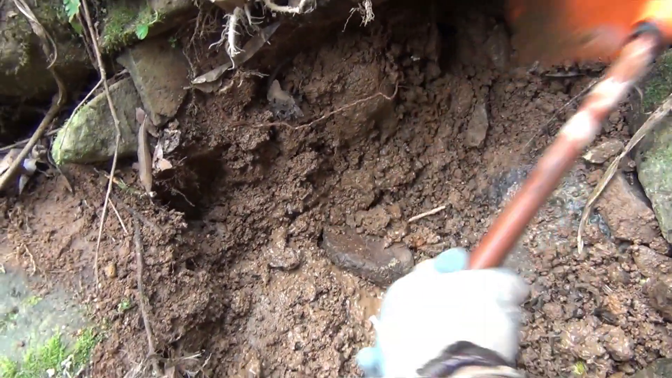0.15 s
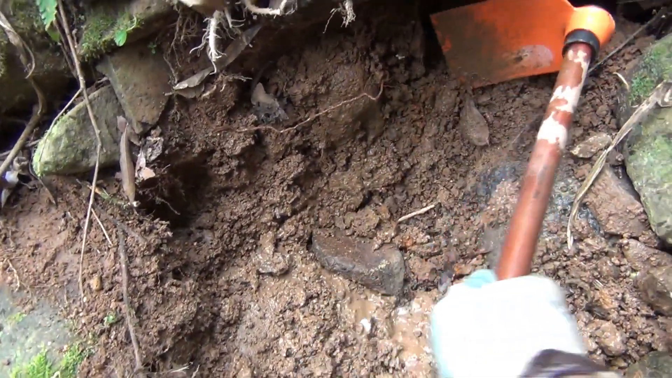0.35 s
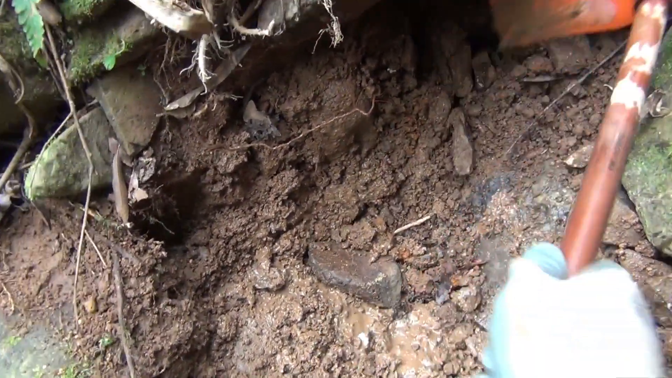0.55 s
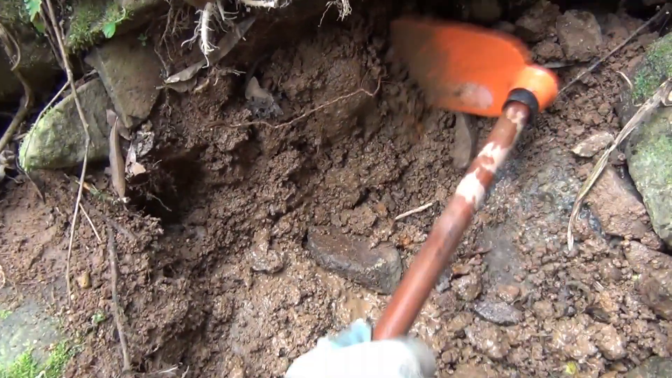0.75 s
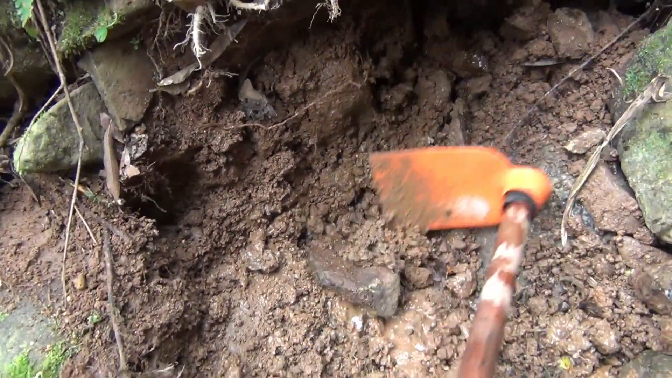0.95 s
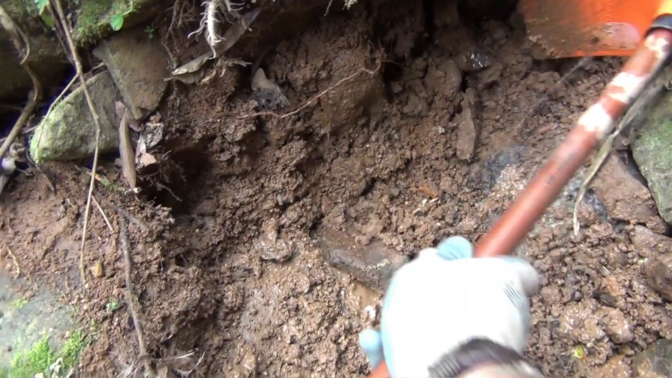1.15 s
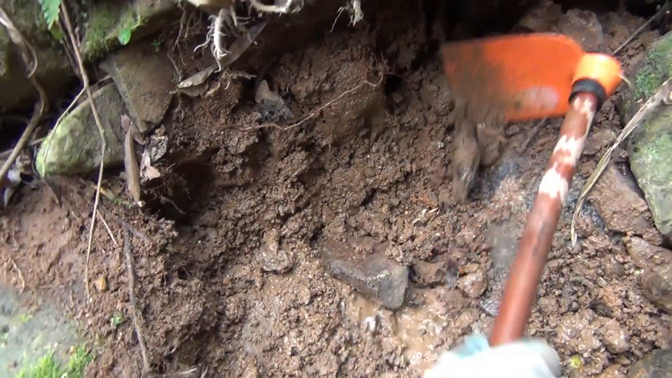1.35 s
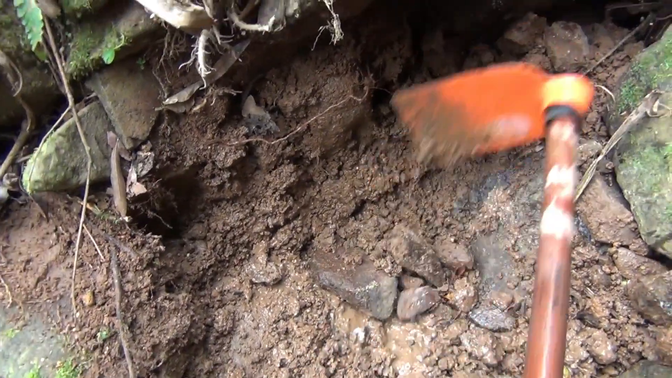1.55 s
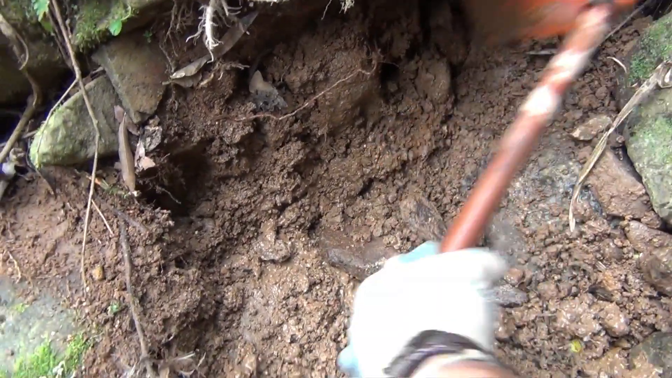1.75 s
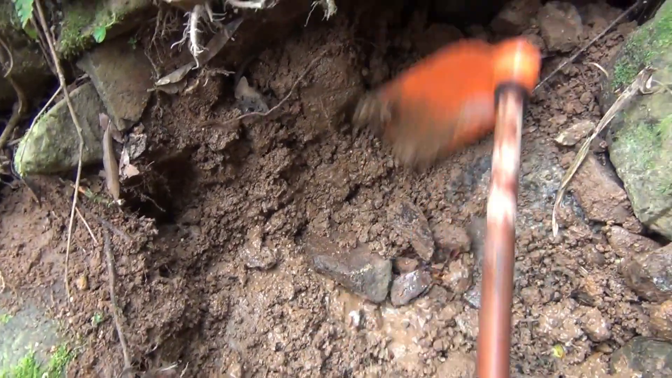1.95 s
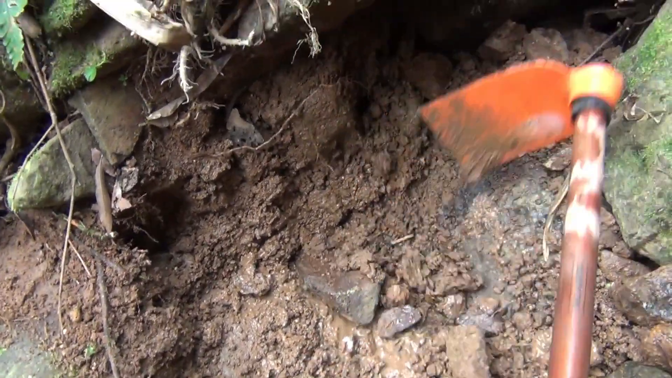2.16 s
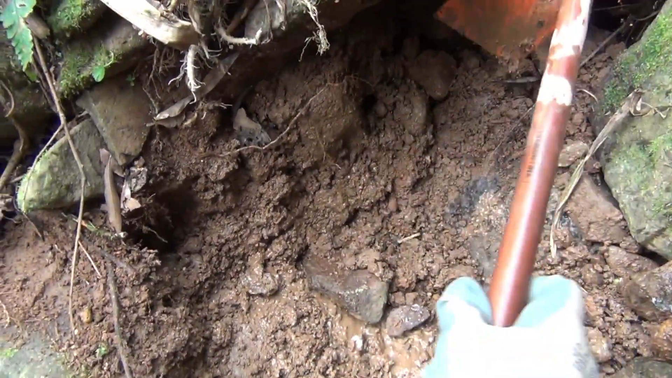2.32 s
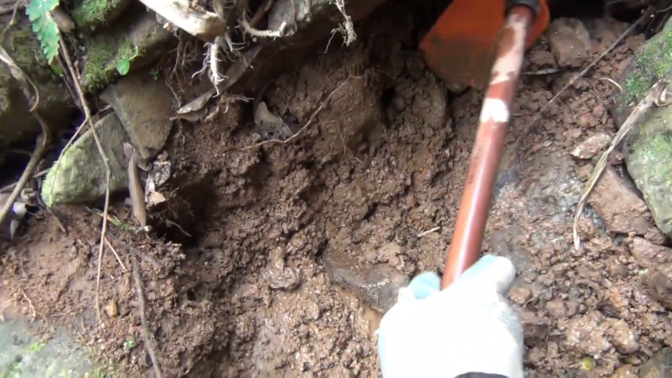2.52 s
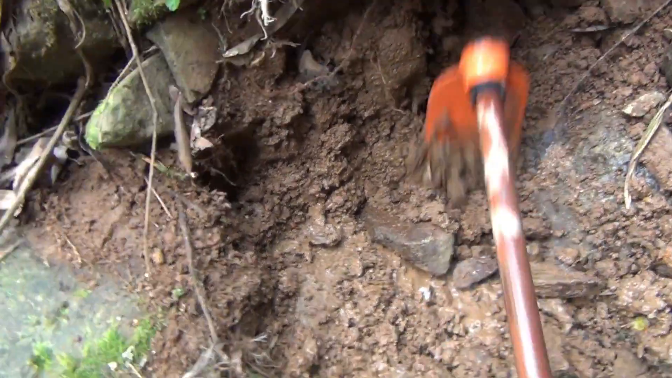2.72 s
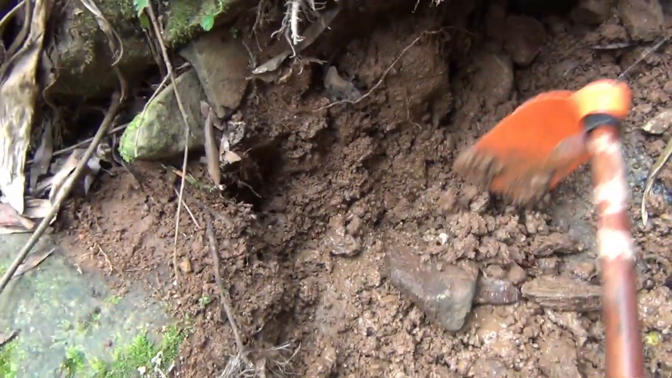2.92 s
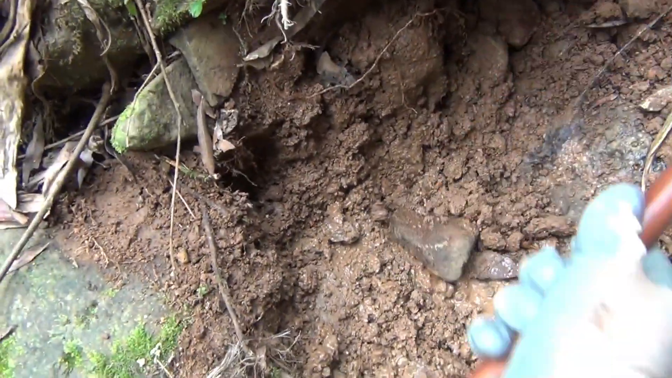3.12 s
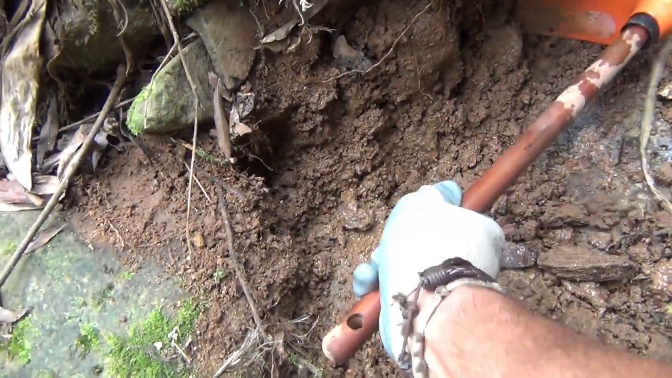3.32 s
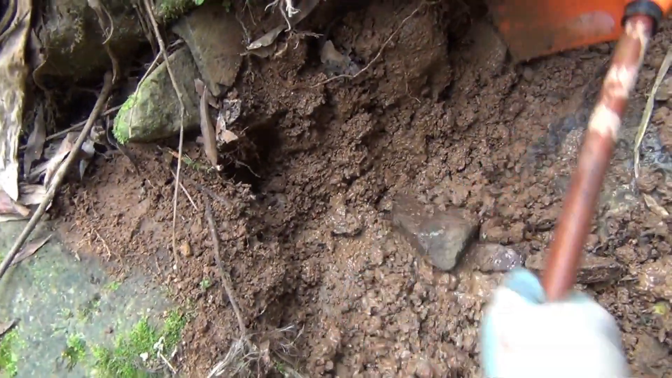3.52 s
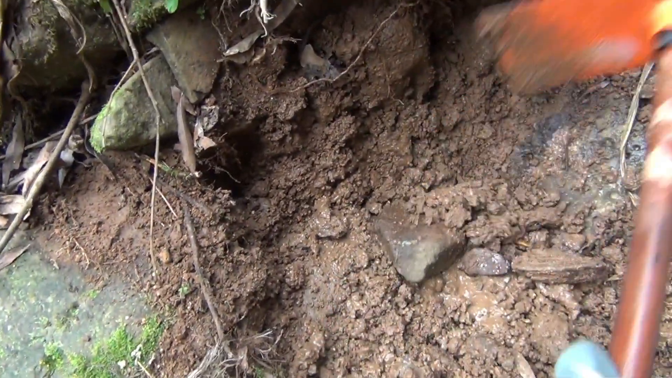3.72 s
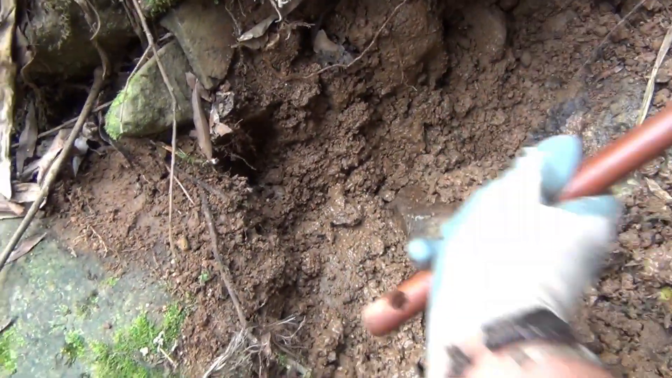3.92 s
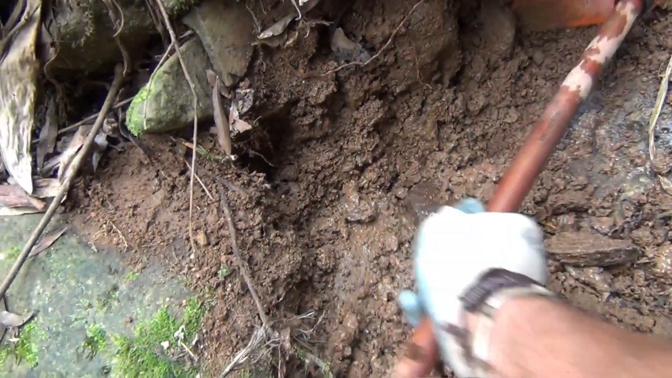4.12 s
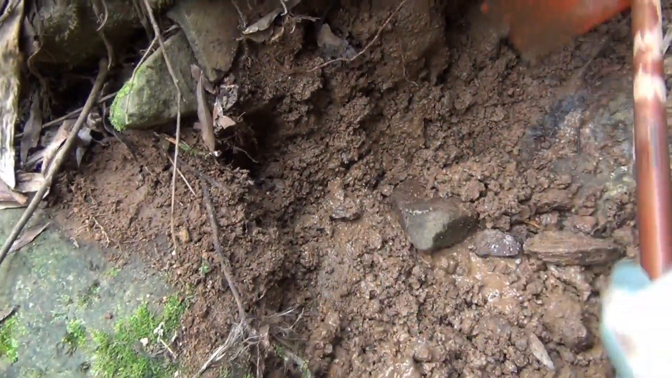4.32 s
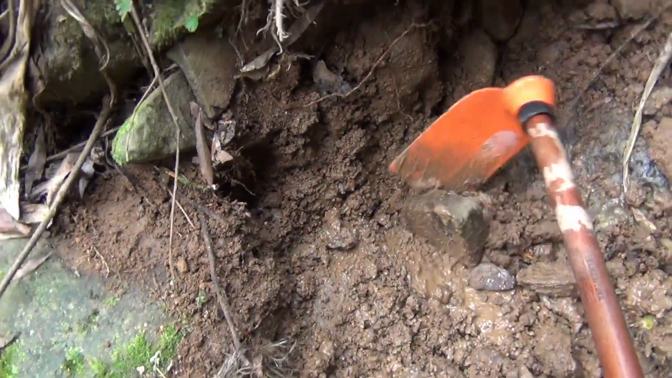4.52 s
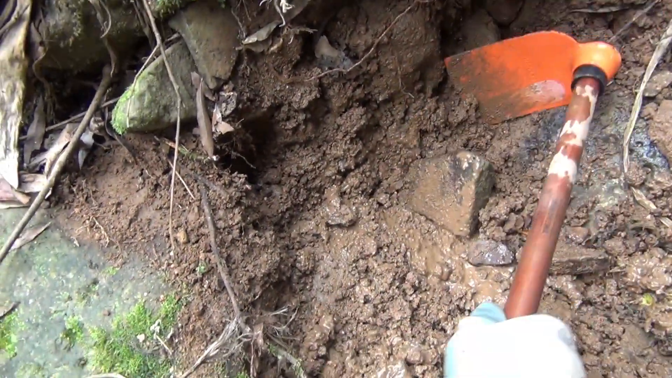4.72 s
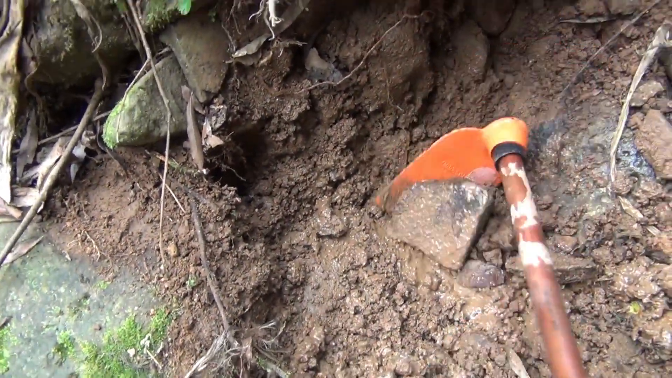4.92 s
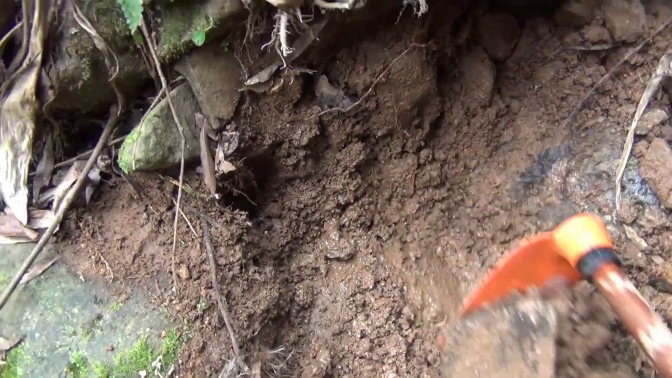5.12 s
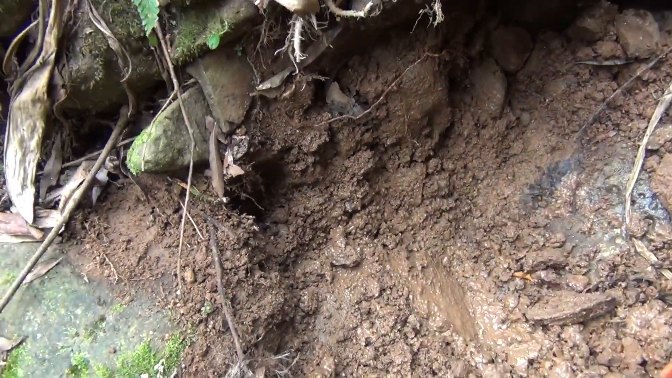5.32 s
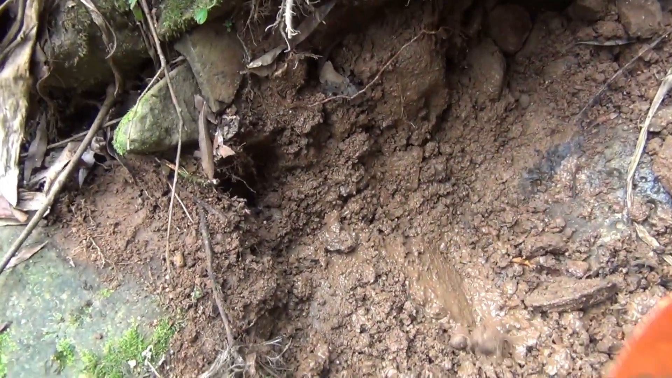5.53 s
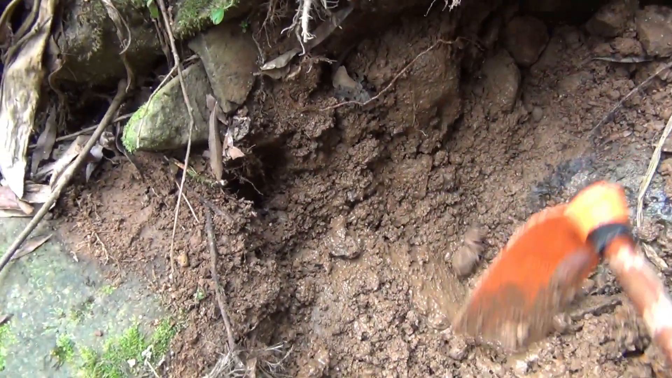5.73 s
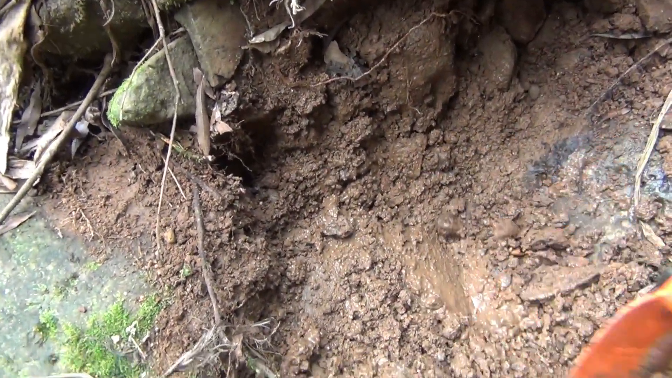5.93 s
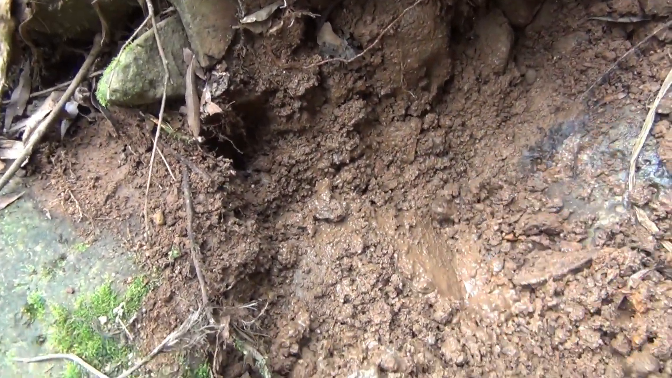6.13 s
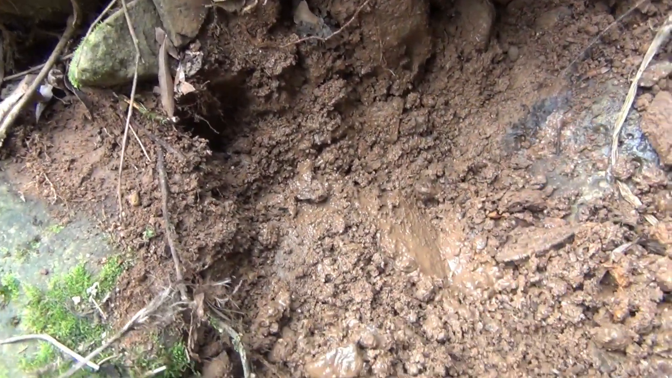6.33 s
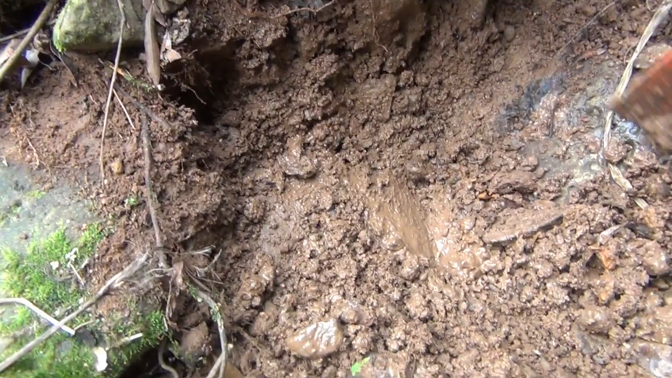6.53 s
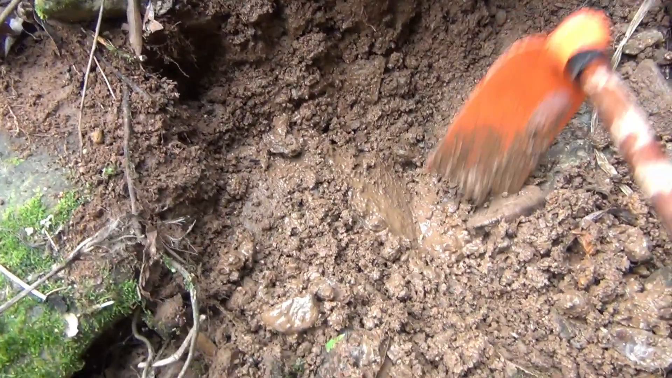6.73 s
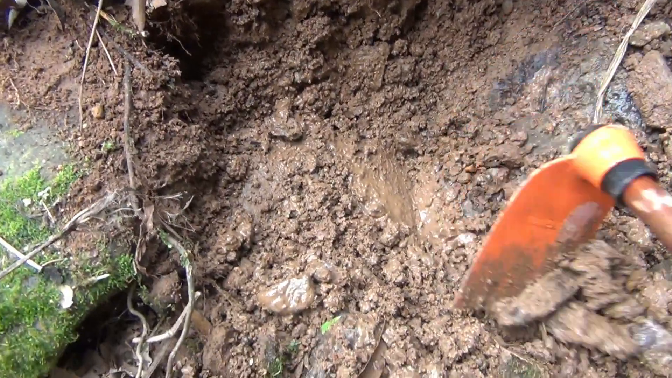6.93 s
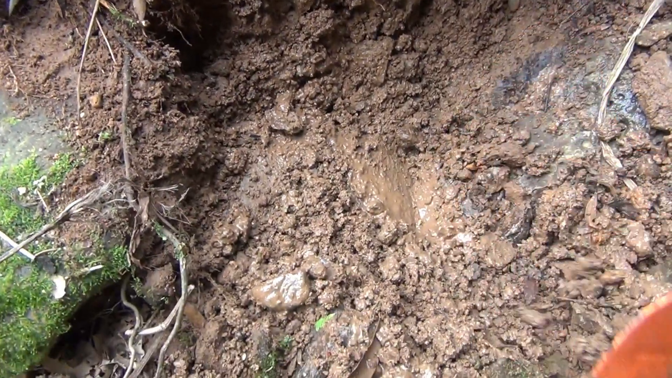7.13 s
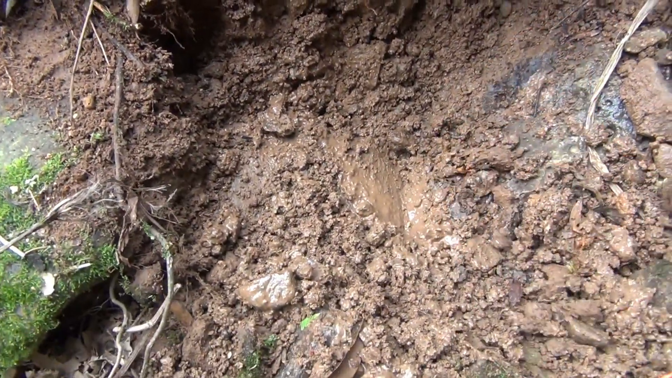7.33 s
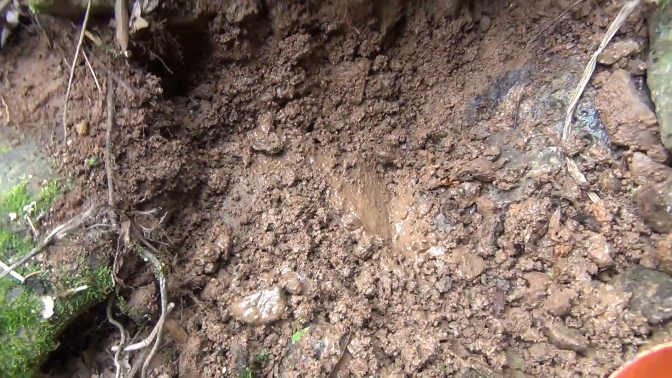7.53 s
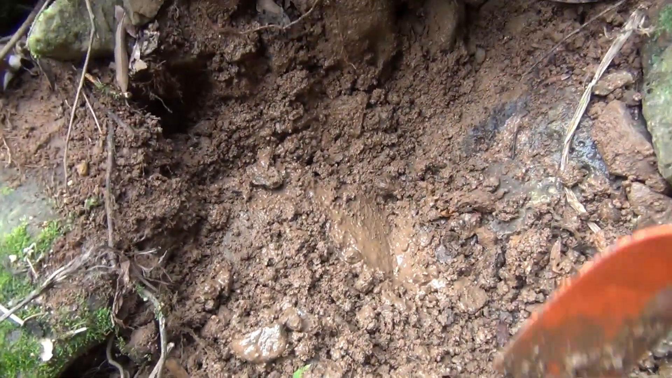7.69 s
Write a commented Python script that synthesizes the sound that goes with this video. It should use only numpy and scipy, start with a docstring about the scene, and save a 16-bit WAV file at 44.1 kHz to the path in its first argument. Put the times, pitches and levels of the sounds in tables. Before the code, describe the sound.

A small steel hoe digs into damp, stony soil outdoors, about an arm's length away and straight ahead. Each strike is a short crunch with a quickly damped metallic clink, and the hardest carry a low thump. A knock at 0.1 seconds is followed by a rapid cluster from 0.6 to 0.8, then strong hits near 1.2, 1.7, 1.9, 2.5, 2.7, 3.3, 4.0, 4.4, 4.7 and 5.0 seconds. Between them grit rasps along the blade, crumbs trickle down and clods roll over with a soft, hollow rumble. From about 5.1 seconds the work is quieter, with light scrapes and taps around 5.8, then one sharp strike at 6.7 and a crunchy drag until 7.2 before the dirt settles. A faint wash of water and a low hum continue underneath. Thin, distant bird whistles come in the first half second and near 3.8, 5.5 and 6.6 seconds.

```python
"""A small steel hoe chops and drags through damp, stony soil, outdoors at arm's length.
Each knock is a short crunch that rings the mud-damped blade; loud ones overload the input with a thump.
Between knocks, grit rubs along the steel, crumbs trickle down and clods roll over.
Behind it sit a soft wash of water, a low hum and far bird whistles."""
import sys
import numpy as np
from scipy import signal
from scipy.fft import rfft, irfft, next_fast_len
from scipy.io import wavfile
from scipy.ndimage import uniform_filter1d

SR = 44100
rng = np.random.default_rng(int(sys.argv[2]) if len(sys.argv) > 2 else 0)


def log_audio(samples):
    """Write samples as a 16-bit WAV file to the path given in sys.argv[1]."""
    # one column per channel
    frames = np.atleast_2d(samples).T
    # limit to full scale, then quantise
    limited = np.clip(frames, -1, 1)
    pcm = np.round(limited * 32767).astype(np.int16)
    wavfile.write(sys.argv[1], SR, pcm)


N = 342216
HIT_SAMPLES = 4096

# The blade's modes. Each row: pitch in Hz, relative level in dB, t60 in seconds before damping scales it.
BLADE_MODES = [(608, -3, 0.034), (707, 2, 0.054), (1059, 7.5, 0.018), (1199, -7, 0.049), (1600.5, -6, 0.04),
               (1894, 0, 0.01), (2280, 4, 0.01), (3140, -0.5, 0.018), (3680, 4.5, 0.0093),
               (4310, -10.5, 0.0055), (5357, -9, 0.066), (5927, -4, 0.018), (6510, -5, 0.025),
               (6870, -5.5, 0.01), (7580, -12, 0.014), (8560, -9.5, .025), (8940, -3.5, 0.014),
               (10550, -8, 0.012), (12900, -15, 0.031), (13400, -23, 0.015), (15200, -15.5, 0.016)]
# Strokes through grit. Each row: start and end in seconds, first and last level in dB, dull and bright
# trims in dB, bare steel over soil in dB, singing pitch in Hz, its relative level in dB.
DRAG_STROKES = [(0.331, 0.394, -33, -31.5, 2.5, -1.5, 6.5, 3600, -12),
                (1.202, 1.29, -30, -55.5, 4, -3, 3, 3700, -6),
                (1.308, 1.409, -32, -32.5, -2, -4.5, -1.5, 3100, -9),
                (1.779, 1.872, -39, -27, -3.5, -4.5, 4.5, 3600, -5),
                (2.48, 2.512, -17.5, -35, 0.5, -5, 0.5, 2100, -8),
                (2.541, 2.674, -35, -24, -1.5, -4.5, -1.5, 696, -4),
                (2.7, 2.803, -19.5, -36.5, -6, -1, 2, 3100, -17),
                (3.315, 3.41, -50, -52, -6, -3, -4.5, 3700, -6),
                (3.403, 3.494, -38, -23, -10, -3.5, 14, 3260, -10),
                (3.554, 3.601, -23, -31.5, -4.5, -3, 0.5, 5330, -6),
                (3.987, 4.173, -40, -55, -7, -5.5, -3.5, 3500, -14),
                (4.176, 4.356, -34.5, -25.5, -4.5, 1.5, 7, 5940, -9.5),
                (4.394, 4.419, -7, -30.5, -15, 4, -1, 6000, 2),
                (4.728, 4.755, -36, -45, 8, 8, -4.5, 700, -3),
                (4.759, 4.88, -26.5, -38, 1, -3, 4, 3200, -3),
                (4.886, 4.996, -33, -30.5, -3.5, -6.5, -4.5, 1760, 1.5),
                (5.01, 5.173, -34.5, -39.5, -8.5, -6.5, -3, 1076, -7),
                (5.196, 5.28, -38.5, -36, -11.5, -6, 0, 3670, -6),
                (5.779, 5.974, -35.5, -41.5, -6, 0, 0.5, 4010, 0),
                (5.971, 6.135, -41, -40, -15, -6, -4, 1105, -6.5),
                (6.246, 6.313, -52, -42.5, -11.5, 8, -15, 2980, -3),
                (6.758, 6.863, -43, -31, 0.5, -0.5, -3.5, 4250, 0.5),
                (6.874, 6.929, -22, -34, -3, 0, 1.5, 1090, -5),
                (6.944, 6.982, -32.5, -38, 3.5, -1.5, -5, 2780, 1),
                (7.023, 7.091, -39, -40.5, -4, -1, -1, 1090, -9),
                (7.089, 7.217, -39, -39.5, -12, -1, -5, 3840, -5)]
# The tone of fine crumbs. Each row: frequency in Hz, gain in dB.
CRUMB_EQ = [(300, -25.5), (600, -3.5), (1200, -6.5), (2500, 0), (4000, 1), (6500, -4.5), (10000, -9),
            (16000, -22)]


def knocks():
    """The hoe bites: a crunch builds and dies, and where the blade is hit decides which modes answer."""
    # Each row: start in seconds, relative level in dB, dull and bright trims in dB,
    # rise and decay in ms, leading pitch in Hz.
    hits = [(0.1347,-0.5,-13,-9,0.97,5.1,3680),(0.1571,-3.5,-5,-5,2.4,2.4,3800),(0.1595,-10.5,-3,-14,10.4,4.2,3700),
            (0.3487,-13.5,-18,-12,3.6,2.6,2250),(.3755,-18,-9,-2.5,1.5,10,2200),(0.4412,-26.5,-14,-19,1.3,2.4,3580),
            (.625,-8.5,-11.5,-3.5,1.6,1.7,3740),(0.63,-0.5,-13,-11.5,0.57,4.2,2030),(0.6597,-6,-13.5,-0.5,1.3,7.6,3750),
            (0.6632,-2.5,-23,-23,11.4,4.6,3770),(0.684,-4.5,-18,-23,6.4,3.5,3670),(0.6961,-7,-5,-2.5,3.6,8.3,3670),
            (0.719,1,-18,-8,1.2,1,3780),(0.7242,-4,-1.5,-7,1.76,3.8,3100),(.76,-19,-24,5,1.1,2.9,3060),
            (0.7675,2.5,-10,-8,1.7,3.3,3170),(0.8095,-10,0,-11,0.71,6.9,692),(0.888,-25.5,-8.5,-12.5,3.1,9.6,1960),
            (1.1184,-40,22,-6,0.82,8.5,720),(1.154,-18,-22,-3,4.9,3,3680),(1.1625,-2,-15,-8,4.8,.9,3660),
            (1.166,-1.5,-14,-4,8.9,5.5,3680),(1.2444,-32.5,11,-3,2.1,9.5,590),(1.3478,-15,-7,-4,0.77,5.2,2870),
            (1.3541,-17.5,-7,-5.5,9,8.5,3040),(1.4003,-16.5,-8,0,3,5.8,8600),(1.465,-22.5,-15.5,-18,1.04,.7,2300),
            (1.7434,-3,-4,-2.5,2.1,3.8,600),(1.8211,-16.5,-6,-3.5,2.7,2,3620),(1.8456,-21.5,-3,-9,4.9,9.5,3530),
            (1.871,-14.5,-5.5,-8,17,3.9,3460),(1.923,-1.5,-9.5,-8.5,1.6,4.2,3220),(1.9518,-5,-15,-3,.8,5.6,8980),
            (1.9761,-4,-1.5,-10.5,2.5,2,1900),(2.063,-33.5,-22,-2.5,1.15,1.6,2680),(2.4649,-5.5,-15.5,-17.5,7.3,6.6,3190),
            (2.5116,-9.5,-13,-21,1.3,2.9,2060),(2.5594,-16,-1.5,-31,0.71,2.2,635),(2.6423,-15,.5,-4.5,7.8,20,2870),
            (2.6749,-7.5,-3.5,-4.5,3.3,4.4,3470),(2.6965,-4.5,-8.5,-8,2,4.1,3140),(2.7247,-6,-8,4,0.42,3.2,7740),
            (2.745,-13,-10,0,0.78,2.3,6510),(2.7957,-22.5,-5.5,-10,7.5,4,2430),(3.05,-41.5,-19,1,0.9,1.8,6430),
            (3.177,-44,-3.5,0,2,1.9,2310),(3.2836,-25.5,-42,5,0.78,1.3,5100),(3.2921,-1.5,-11.5,-4,2.6,3.1,3400),
            (3.2939,-10,-4.5,-4.5,12.6,3.8,3960),(3.4187,-20,-7,-6.5,1.9,9.8,3270),(3.444,-17.5,-9.5,-9,2.5,18,3240),
            (3.4678,-12.5,0,7,1.4,2.7,6790),(3.4802,-14,8,-17,3.7,1.8,590),(3.4895,-11,-5,0,11.4,5.7,1598),
            (3.5471,-20,-20,6,1.9,8.2,5330),(3.561,-10.5,-2,1,2.6,2.7,3700),(3.9973,-1.5,-29,-3,0.81,2.7,3170),
            (4.0053,1,-11.5,-4,3.8,2.5,3670),(4.181,-24.5,-3.5,-4,1.5,2.6,3970),(4.2548,-16,1.5,1.5,1.6,3.6,6240),
            (4.282,-18,-4,-2,1.1,7.3,1610),(4.303,-19.5,5,5.5,3.3,3.6,704),(4.314,-17.5,-3,-4,1.8,8.3,1560),
            (4.346,-15,-14,-2,1.1,3.3,1590),(4.326,-17.5,-10,7,2.5,5.3,5260),(4.3718,-2,-12,-3,0.99,2.2,3250),(4.4064,-3.5,-9.5,-3,2.1,3.8,2280),
            (4.4246,-19.5,-4,-26,0.75,4.6,1090),(4.6949,2,-12,-12.5,1.02,2.9,3200),(4.7657,-15,-3,-5,1.4,2.3,3200),
            (4.7915,-10.5,-7.5,-6.5,1.1,5.6,3240),(4.816,-16,-14,2.5,0.74,1.1,5430),(4.8322,-18,-7,2.5,1.3,9.6,6950),
            (4.904,-28,-16,-1,9.4,2.8,1690),(4.9766,-9,-14,-22,1.1,2.6,2220),(4.988,-12,-2.5,-3,2,5.9,1503),
            (5.0095,-7.5,-3.5,-7,0.23,9.9,1090),(5.0305,-21,-2,-17,0.68,1.7,1080),(5.0606,-30,-26,8,4.8,4,6200),
            (5.2045,-25,-16,-17,.66,1.1,3500),(5.2772,-22,-5.5,-7.5,8,4.6,1070),(5.337,-30.5,-9.5,-14,0.72,3,2740),
            (5.4633,-35,-9,-11,0.73,3.6,3800),(5.7385,-13,-9,-7,6.2,10,3080),(5.7506,-14.5,-1.5,1.5,12.5,4.3,3993),
            (5.8549,-24.5,-7,0.5,5.2,1.5,3900),(5.9689,-35.5,9.5,16,3.1,4.4,8100),(5.9925,-24.5,6.5,3,2.1,2,3650),
            (6.046,-14,-31,-14,1.8,1,3140),(6.2285,-22,-20,-3.5,1.4,1.8,2860),(6.381,-33,-13,5.5,1.3,7.2,7600),
            (6.528,-50.5,20,12,3.5,4,480),(6.6074,-29,-3.5,-21,3.6,1.3,2700),(6.7388,1,-9.5,-6,0.58,2.6,3040),
            (6.8267,-15.5,-7,-10,1.2,0.59,3980),(6.887,-19,-7,1,7.4,17,3920),(6.9131,-25.5,8,-7,9.3,4.3,1150),
            (6.9966,-17,-15,-11,1.1,11,3500),(7.0062,-7,-0.5,-3,7.6,5.1,3720),(7.029,-20,-12,4,1.4,3,3830),
            (7.0414,-17,1.5,2.5,2.2,4.2,1110),(7.0981,-23,-14,-4.5,6,27,3970),(7.164,-29,-19,-4,1.5,2.4,3850),
            (7.2007,-22,-15,-11,0.41,3.6,4160),(7.552,-39.5,-14,2,4.6,13,3770)]
    # The broad crunch of soil and stone. Each row: frequency in Hz, gain in dB.
    soil_eq = [(200, -14), (350, -8), (700, -2), (1500, -1), (2500, 3), (4000, 2), (7000, -3), (11000, -8),
               (16000, -12)]
    out, lead_in_ms = np.zeros(N), 12
    ms = 1000 * np.arange(HIT_SAMPLES) / SR - lead_in_ms
    soil, bands = eq_response(soil_eq, HIT_SAMPLES), tone_bands(HIT_SAMPLES)
    stroke_starts, stroke_steel_db = np.transpose(DRAG_STROKES)[[0, 6]]
    mode_hz = np.array(BLADE_MODES)[:, 0]
    chance = rng.standard_normal((len(hits), 3, len(mode_hz), 1))
    for (start, db, dull_db, bright_db, rise, fall, lead_hz), (spot, grip, shift) in zip(hits, chance):
        shape = np.where(ms < rise, np.maximum(ms / rise, 0) ** 0.84, np.exp(-(ms - rise) / fall))
        settling = amp(-21.5) * np.exp(-ms / 14) + amp(-40.5) * np.exp(-ms / 45)  # loosened crumbs
        shape += settling * (ms > rise)
        shape += amp(-19.5) * np.exp(ms) * (ms < 0)  # the edge cuts through soft soil first
        grains = np.repeat(rng.standard_normal(HIT_SAMPLES // 32), 32)
        shape *= amp(3.08 * grains)  # stones crack one after another
        # The mode nearest the leading pitch takes most of the blow, bent there by the load of soil.
        nearest = (np.arange(len(mode_hz)) == np.argmin(np.abs(mode_hz - lead_hz)))[:, None]
        detune = np.where(nearest, lead_hz / mode_hz[:, None], 1 + 0.0092 * shift)
        steel_db = np.interp(start, stroke_starts, stroke_steel_db)  # bare steel rings louder, longer
        damping = np.where(nearest, 1.6, 2.1) * amp(-.4 * steel_db) * 1.25 ** grip
        strike_db = np.where(nearest, 11.0, 5.6 * np.clip(spot, -3, 1.2)) - 3 + steel_db
        ring = (amp(strike_db) * blade_response(damping, detune)).sum(axis=0)
        blow, crush = rfft(rng.standard_normal((2, HIT_SAMPLES)) * shape)
        crunch = blow * ring + crush * amp(17) * soil
        parts = [irfft(crunch * band) for band in bands]
        width = np.sum(shape ** 2) + 60  # samples over which the energy is spread
        dull, middle, bright = (part / np.sqrt(np.sum(part ** 2) / width) for part in parts)
        knock = middle + amp(dull_db) * dull + amp(bright_db) * bright
        add(out, start - lead_in_ms / 1000, amp(db - 4.5) * knock)
    return out


def blade_response(damping, detune=1):
    """Each mode's spectrum after a tap; soil pressed on the steel shortens the ring and bends it."""
    hz, db, t60 = np.transpose(BLADE_MODES)[:, :, None]
    omega, loss = 2 * np.pi * hz * detune, np.log(1000) * damping / t60
    bin_hz = np.fft.rfftfreq(HIT_SAMPLES, 1 / SR)
    return amp(db) * SR * omega / ((2j * np.pi * bin_hz + loss) ** 2 + omega ** 2)


def overload_thumps():
    """A thump follows each loud knock as the input overloads: a soft push, a short note, a low boom."""
    # Each row: start in seconds, relative level in dB.
    thumps = [(0.134, -37), (0.157, -39), (0.633, -34), (0.663, -39), (0.703, -37), (0.77, -25),
              (0.819, -49), (1.177, -21), (1.745, -27), (1.928, -26), (1.954, -36), (1.974, -30.5),
              (2.465, -38), (2.722, -24), (3.291, -25.5), (3.309, -44), (3.466, -38), (3.56, -43),
              (4.007, -20), (4.373, -34), (4.407, -28), (4.699, -24), (4.794, -39.5), (5.007, -37),
              (6.74, -31)]
    note_hz, boom_hz = 171, 70
    out, t = np.zeros(N), np.arange(HIT_SAMPLES) / SR
    push = amp(4) * t / 0.00093 * np.exp(1 - t / 0.0018)
    note = amp(-4) * np.sin(2 * np.pi * note_hz * t) * np.exp(-t / .008)
    boom = amp(-17.5) * np.sin(2 * np.pi * boom_hz * t) * np.exp(-t / 0.023)
    for start, db in thumps:
        add(out, start, amp(db) * (push + note + boom))
    return out


def grit():
    """Dense ticks clump as stones catch and slip; some scratch the steel, the rest crumble."""
    attack_s, release_s, chatter_db = 0.024, 0.013, 4.5
    out, t, size = np.zeros(N), np.arange(N) / SR, next_fast_len(N + HIT_SAMPLES)
    clumps = amp(chatter_db * wander(90))
    ring = rfft(irfft(blade_response(damping=.7).sum(axis=0)), size)
    steel = split_bands(rfft(ticks(9000, spread_db=3.3) * clumps, size) * ring, size)
    crumbling = rfft(ticks(9000, spread_db=7.2) * clumps, size)
    soil = split_bands(crumbling * eq_response(CRUMB_EQ, size), size)
    patches = [amp(2.4 * wander(50)) for _ in steel]  # the rub wanders between dull and bright
    for start, end, first_db, last_db, dull_db, bright_db, steel_db, sing_hz, sing_db in DRAG_STROKES:
        now = slice(int(start * SR), int((end + .15) * SR))
        force = amp(np.interp(t[now], (start, end), (first_db, last_db)))
        force *= np.clip((t[now] - start) / attack_s, 0, 1)
        force *= np.exp(-np.maximum(t[now] - end, 0) / release_s)
        resonance = signal.iirpeak(sing_hz, Q=24, fs=SR)  # the load picks out one pitch
        sing = signal.lfilter(*resonance, sum(soil)[now])
        out[now] += force * at_level(sing, sing_db)
        steel_share = 1 / (1 + amp(-2 * steel_db))
        for bare, muddy, patch, db in zip(steel, soil, patches, (dull_db, 0, bright_db)):
            rub = np.sqrt(steel_share) * bare[now] + np.sqrt(1 - steel_share) * muddy[now]
            out[now] += amp(db) * force * patch[now] * rub
    return out


def trickle():
    """Loosened crumbs patter down: a fine hiss and brief rustles, each crumb size at its own pitch."""
    # Each row: time in seconds, mid-band level in dB, dull and bright trims in dB.
    flow = [(0, -59, -13, 0), (.45, -60.5, 4, 0), (.85, -44, -14, -5), (1.1, -62.5, -17, 2),
            (1.45, -51.5, -3, 4.5), (1.65, -70, -13, -5.5), (2.05, -54, -10, 1.5), (2.3, -67.5, -9, -3.5),
            (2.83, -53.5, -3, 1.5), (3.2, -66, -5.5, 6.5), (3.6, -48.5, -3, -0.5), (3.95, -64.5, -4, -2.5),
            (4.45, -49.5, -8, 2), (4.68, -61, -8.5, -4), (5.3, -47, -8.5, -0.5), (5.7, -59, -3, 5),
            (6.15, -42, -8.5, 1.5), (6.65, -57.5, 1.5, 6.5), (7.25, -51, -0.5, -6), (7.76, -57, 1.5, 3.5)]
    crumbs_per_s, rustle_ms = 60, 1.4  # in each band
    db, dull_db, bright_db = automation(flow)
    size, patter, slides = next_fast_len(N + HIT_SAMPLES), 0, wander(30)
    fade = [1, -np.exp(-1000 / (rustle_ms * SR))]
    for hz in 400 * 1.7 ** np.arange(7):
        landings = np.abs(ticks(crumbs_per_s, spread_db=5.5))
        rustle = signal.lfilter([1], fade, signal.lfilter([1], fade, landings))
        patter += band_noise(hz, 1.7 * hz) * (at_level(rustle, 0) + amp(1.5 + 3.9 * slides))
    dull, middle, bright = split_bands(rfft(patter, size) * eq_response(CRUMB_EQ, size), size)
    return amp(db) * (amp(dull_db) * dull + middle + amp(bright_db) * bright)


def clods():
    """Clods and stones roll over with a hollow, lumpy rumble."""
    # Each row: time in seconds, level in dB.
    fader = [(0, -56.5), (1, -66), (3.6, -64), (3.67, -39.5), (3.8, -60), (3.95, -60), (5.7, -62),
             (5.95, -47.5), (6.2, -52.5), (6.5, -58), (7.0, -43), (7.3, -49.5), (7.76, -55.5)]
    rumble = band_noise(260, 480) * amp(2.5 * wander(35))
    return amp(automation(fader)[0]) * at_level(rumble, 0)


def water_and_hum():
    """Distant water: smooth noise with a slight flicker, over a wavering low hum."""
    # The water's tone. Each row: frequency in Hz, gain in dB.
    water_eq = [(25, -11), (60, -5), (140, -0.5), (300, -9), (800, -3.5), (1500, -10), (2500, -6.5),
                (4000, -19.5), (8000, -26), (12000, -27), (16000, -18)]
    # The background ducks under the loud knocks and slowly recovers, as with a recorder's gain control.
    # Each row: time in seconds, relative level in dB.
    fader = [(0, -55), (.6, -55), (1.0, -59), (1.7, -61), (2.3, -62), (3.2, -62), (4.1, -62), (4.6, -64),
             (5.6, -62), (6.4, -57), (7.3, -55), (7.76, -55.5)]
    hum_hz, hum_width_hz = 58.7, 14
    size = next_fast_len(N)
    water = irfft(rfft(rng.standard_normal(size)) * eq_response(water_eq, size), size)[:N]
    water *= amp(1.5 * wander(60))
    hum = signal.lfilter(*signal.iirpeak(hum_hz, hum_hz / hum_width_hz, SR), rng.standard_normal(N))
    return amp(automation(fader)[0]) * (at_level(water, 4.3) + at_level(hum, -2.5))


def birds():
    """Thin gliding whistles, made uneven by distance."""
    # Each row: start and length in seconds, first and last pitch in Hz, level in dB before the flutter.
    whistles = [(.0, 0.038, 2840, 2600, -49), (0.014, 0.035, 2430, 2430, -50),
                (.235, 0.057, 2150, 2310, -57), (.485, 0.11, 2310, 2430, -48),
                (3.775, .05, 2500, 2450, -58), (3.945, .03, 3600, 4220, -50),
                (5.448, 0.15, 2070, 2430, -55), (5.588, 0.045, 1720, 1710, -56),
                (6.579, .07, 2550, 2570, -46.5)]
    out = np.zeros(N)
    for start, length, first_hz, last_hz, db in whistles:
        count = int(length * SR)
        tone = np.sin(2 * np.pi * np.cumsum(np.linspace(first_hz, last_hz, count)) / SR)
        add(out, start, amp(db) * signal.windows.tukey(count, .4) * tone)
    return out * amp(3.4 * wander(100))


def amp(db):
    return 10 ** (np.asarray(db) / 20)


def at_level(x, db):
    return x * amp(db) / np.sqrt(np.mean(x ** 2))


def add(out, start_s, sound):
    """Mix a sound in at its start time."""
    i = int(max(start_s, 0) * SR)
    out[i:i + len(sound)] += sound[:len(out) - i]


def automation(table):
    """One curve per value column, ramping between the times in the first."""
    times, *columns = np.transpose(table)
    return [np.interp(np.arange(N) / SR, times, column) for column in columns]


def eq_response(table, size):
    """Causal frequency response through (Hz, dB) points."""
    hz, db = np.transpose(table)
    log_gain = np.log(amp(np.interp(np.log(np.fft.rfftfreq(size, 1 / SR) + 1), np.log(hz), db)))
    cepstrum = irfft(log_gain, size)
    cepstrum[1:size // 2] *= 2
    cepstrum[size // 2 + 1:] = 0
    return np.exp(rfft(cepstrum))


def tone_bands(size):
    """Dull, middle and bright crossover curves; the small blade sends out no bass."""
    bass_hz, dull_hz, bright_hz = 331, 1450, 4900
    hz = np.fft.rfftfreq(size, 1 / SR)
    dull = 1 / (1 + (hz / dull_hz) ** 6)
    bright = 1 - 1 / (1 + (hz / bright_hz) ** 8)
    bass_cut = 1 - 1 / (1 + (hz / bass_hz) ** 4)
    return dull * bass_cut, 1 - dull - bright, bright


def split_bands(spectrum, size):
    """Dull, middle and bright part of a sound, each at unit level."""
    return [at_level(irfft(spectrum * band, size)[:N], 0) for band in tone_bands(size)]


def band_noise(low_hz, high_hz):
    band = signal.butter(2, (low_hz, high_hz), "band", fs=SR, output="sos")
    return signal.sosfilt(band, rng.standard_normal(N))


def wander(rate_hz):
    """Random steps, smoothed twice, with a spread near 1."""
    hold = int(SR / rate_hz)
    steps = np.repeat(rng.standard_normal(N // hold + 1), hold)
    return 1.3 * uniform_filter1d(uniform_filter1d(steps, hold), hold)[:N]


def ticks(per_s, spread_db):
    """Ticks at random moments, many small and a few large."""
    impulses = (rng.random(N) < per_s / SR) * rng.standard_normal(N)
    return impulses * amp(spread_db * np.minimum(rng.exponential(size=N), 4))


def scene():
    """All straight ahead; the thumps are a little stronger and later on the right."""
    low = overload_thumps()
    centre = knocks() + grit() + trickle() + clods() + water_and_hum() + birds()
    return centre + np.array([amp(-1.3) * low, np.roll(low, 14)])


def record(dry):
    """Loud knocks overload the input; coupling stages cut the lowest bass, a steep filter the top."""
    low_cuts_hz, top_hz = (24, 19), 15800  # low cuts: left, right
    saturated = np.tanh(0.87 * dry)
    coupled = [signal.sosfilt(signal.butter(3, hz, "high", fs=SR, output="sos"), side)
               for hz, side in zip(low_cuts_hz, saturated)]
    top_cut = signal.ellip(9, .3, 50, top_hz, fs=SR, output="sos")
    return signal.sosfilt(top_cut, np.clip(coupled, -1, 1))


dry = scene()
out = record(dry)
log_audio(out)
```